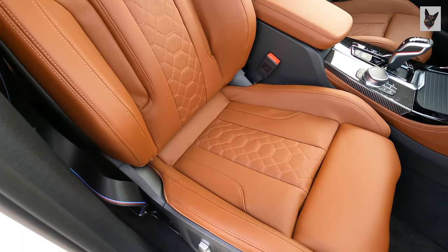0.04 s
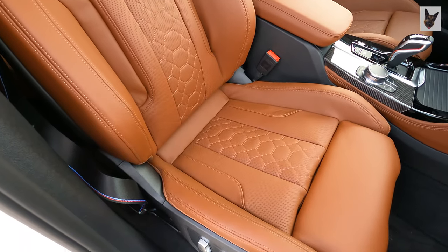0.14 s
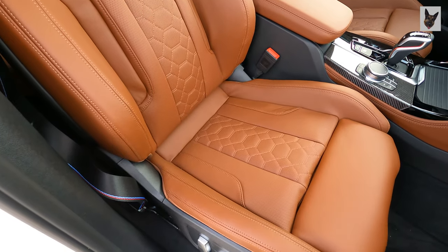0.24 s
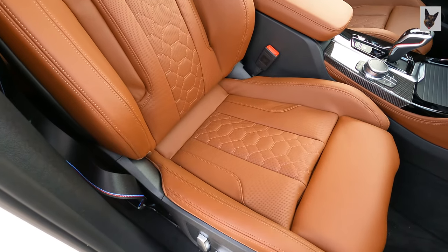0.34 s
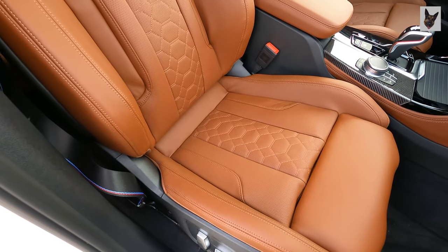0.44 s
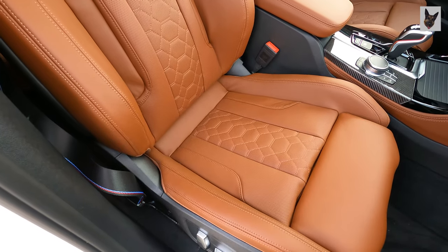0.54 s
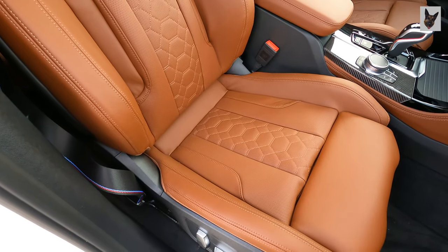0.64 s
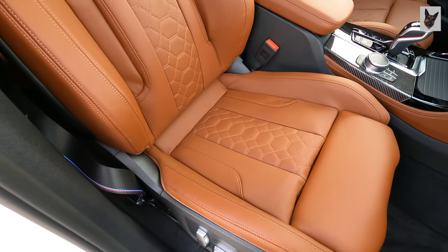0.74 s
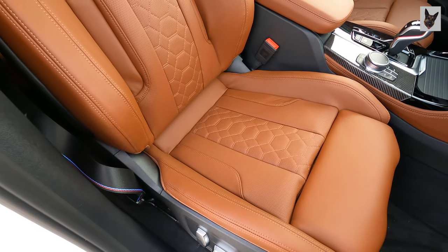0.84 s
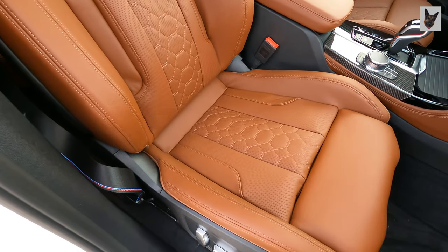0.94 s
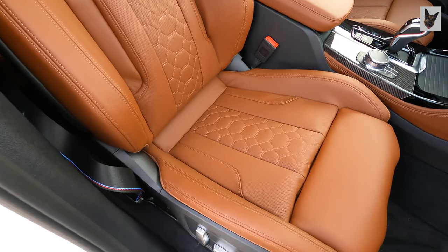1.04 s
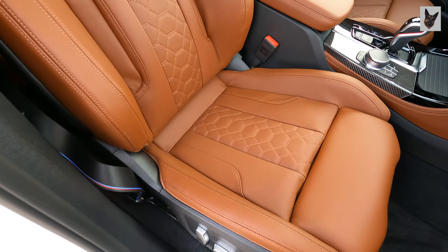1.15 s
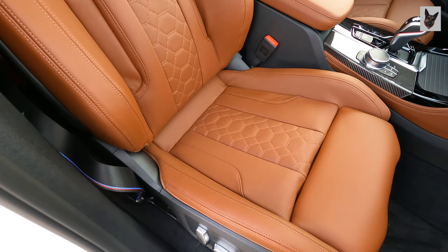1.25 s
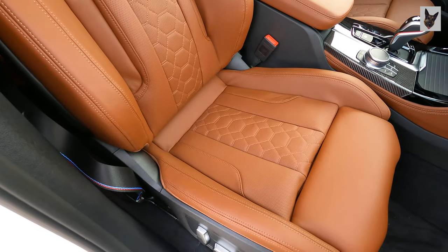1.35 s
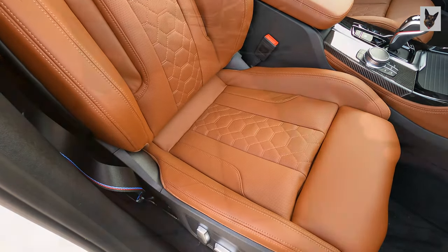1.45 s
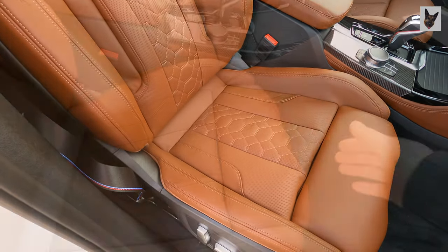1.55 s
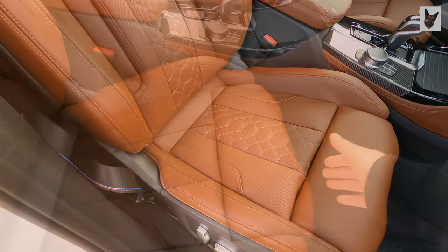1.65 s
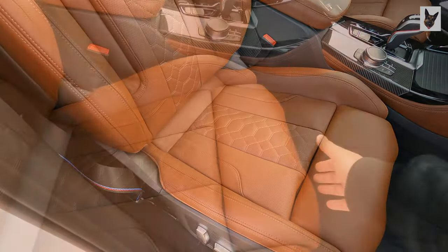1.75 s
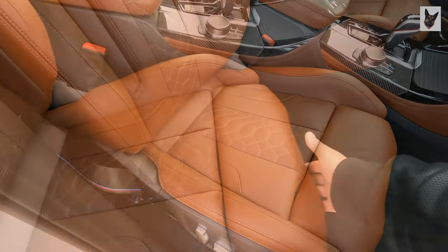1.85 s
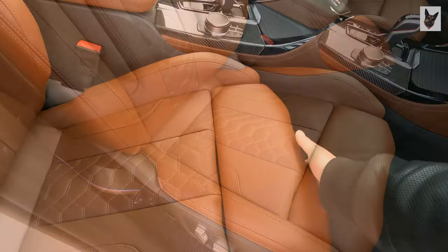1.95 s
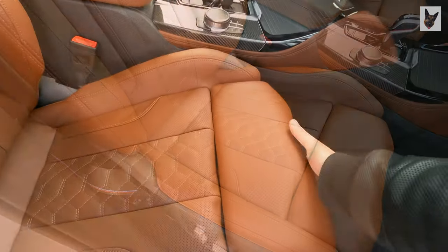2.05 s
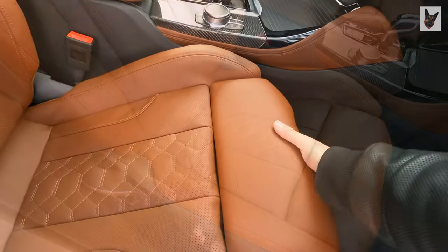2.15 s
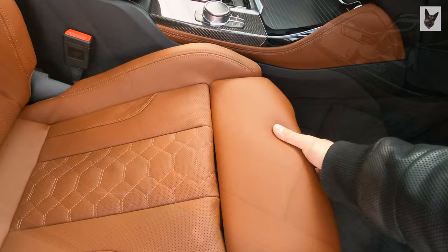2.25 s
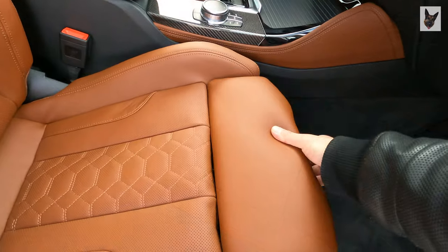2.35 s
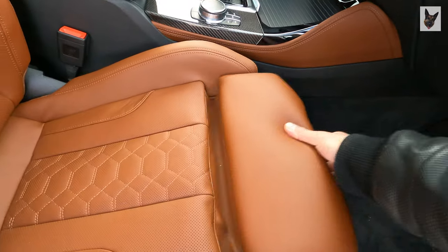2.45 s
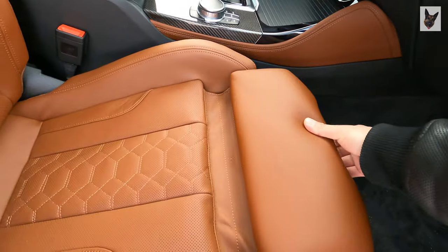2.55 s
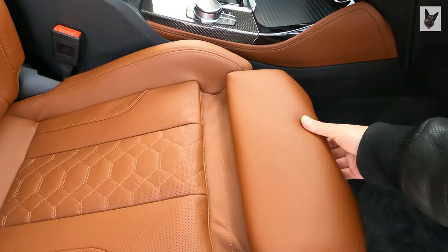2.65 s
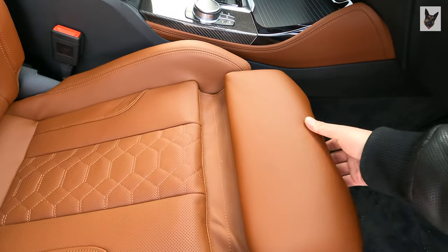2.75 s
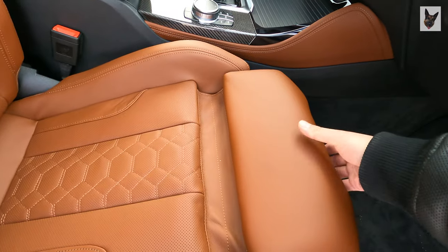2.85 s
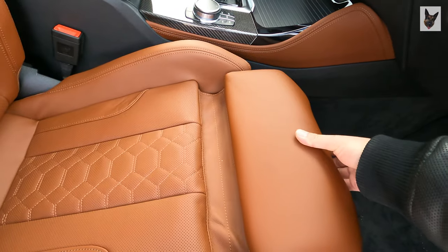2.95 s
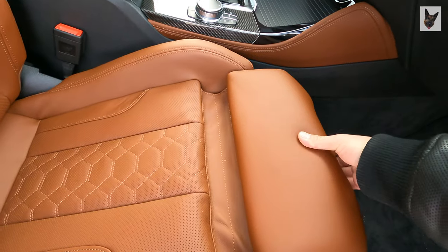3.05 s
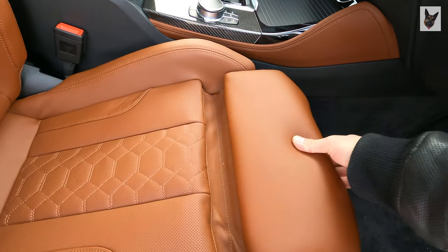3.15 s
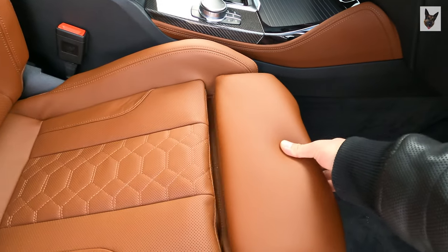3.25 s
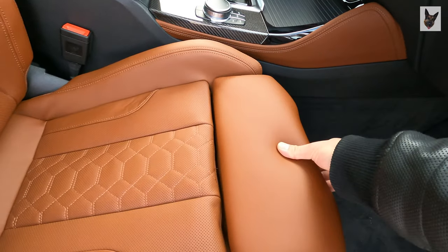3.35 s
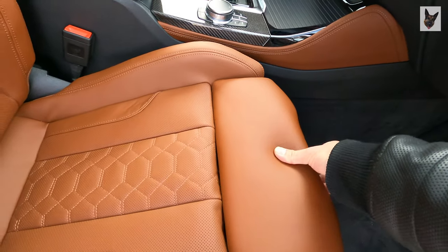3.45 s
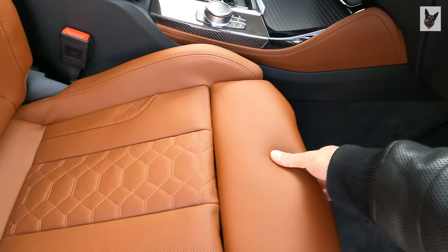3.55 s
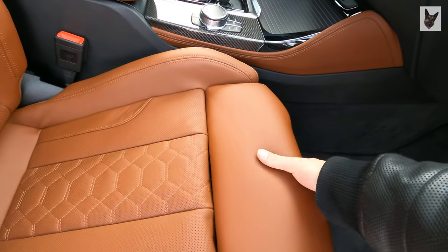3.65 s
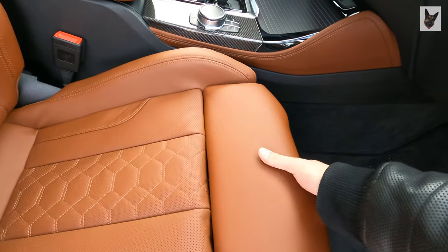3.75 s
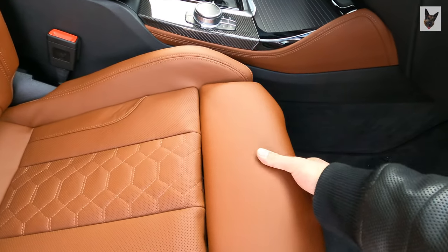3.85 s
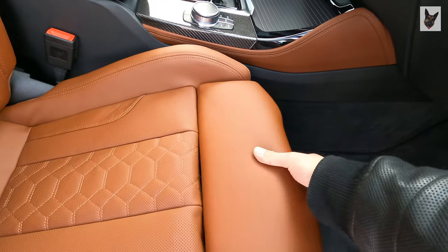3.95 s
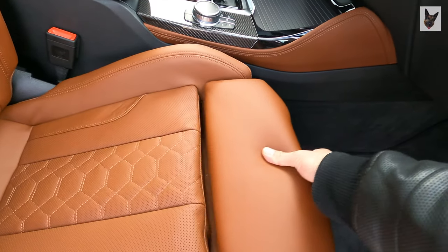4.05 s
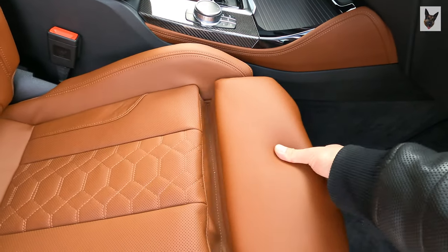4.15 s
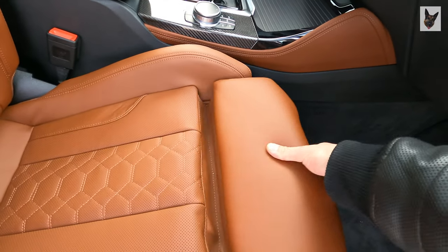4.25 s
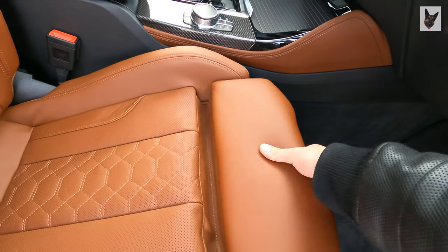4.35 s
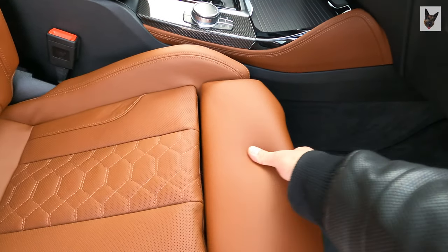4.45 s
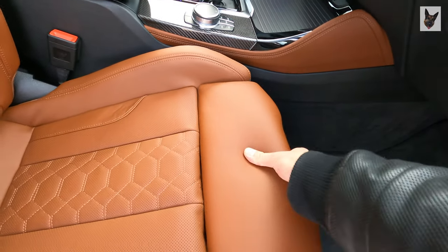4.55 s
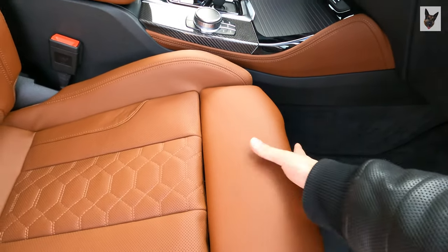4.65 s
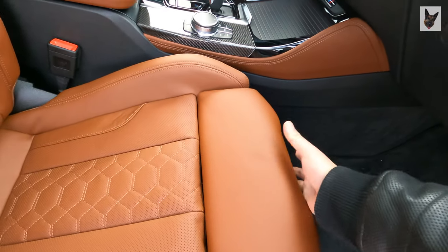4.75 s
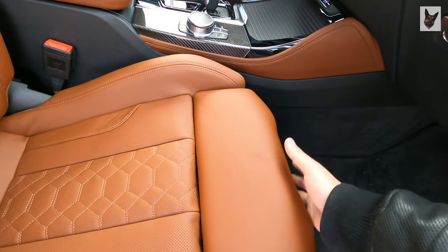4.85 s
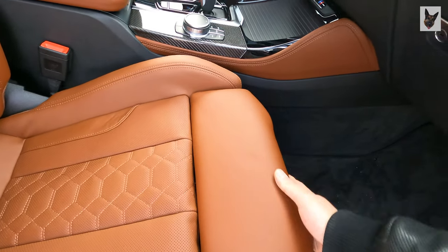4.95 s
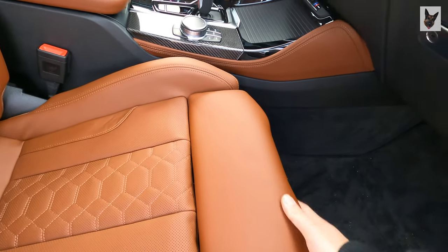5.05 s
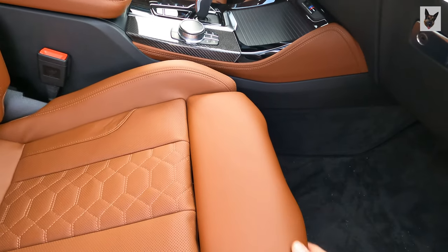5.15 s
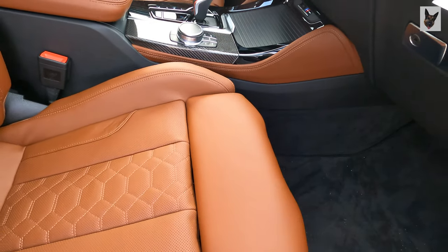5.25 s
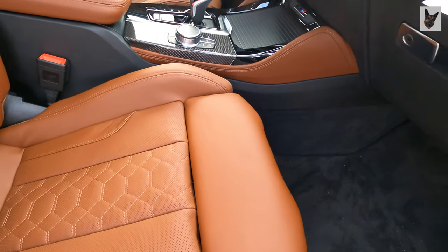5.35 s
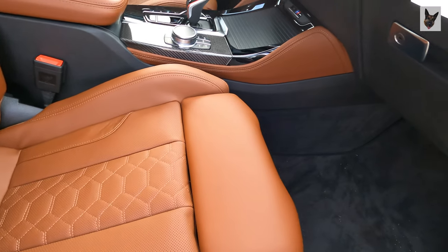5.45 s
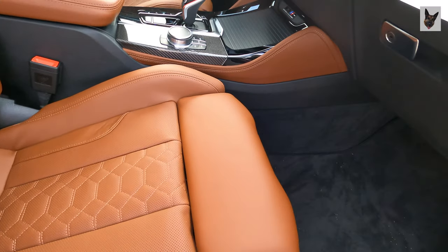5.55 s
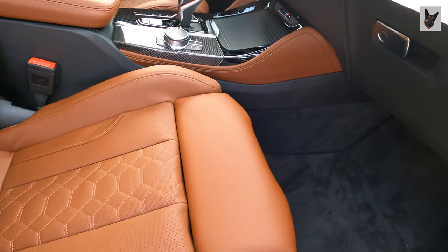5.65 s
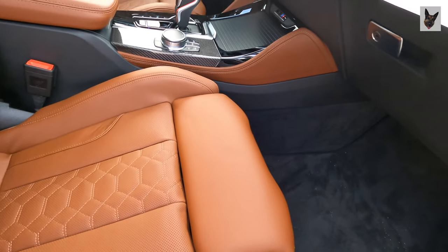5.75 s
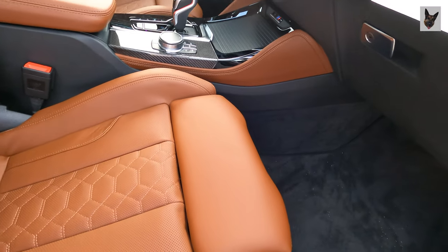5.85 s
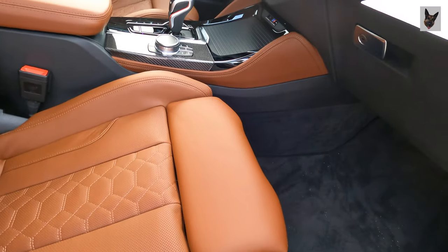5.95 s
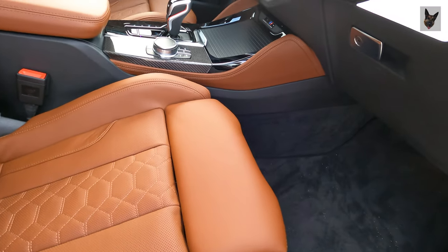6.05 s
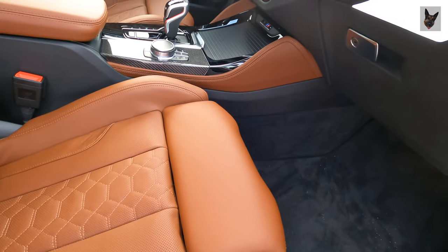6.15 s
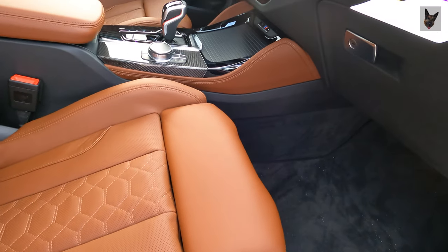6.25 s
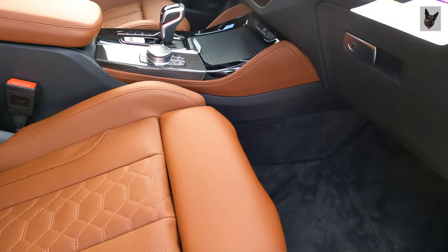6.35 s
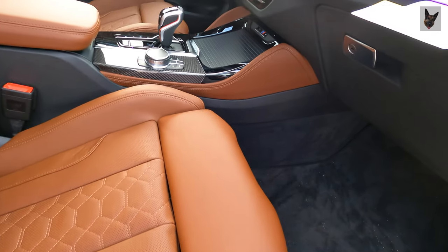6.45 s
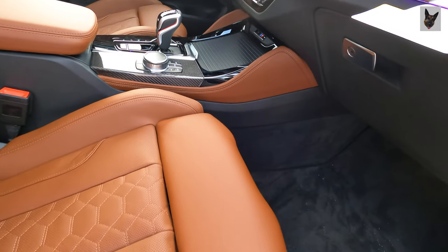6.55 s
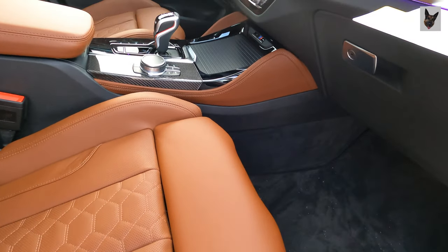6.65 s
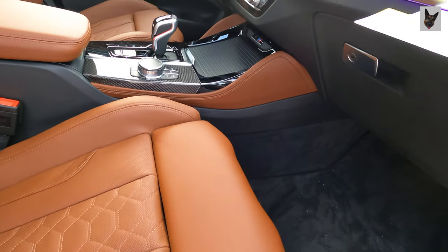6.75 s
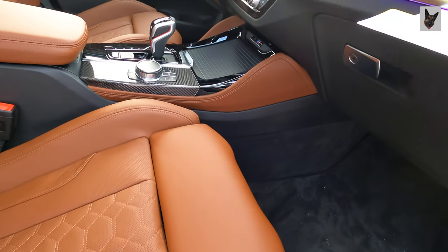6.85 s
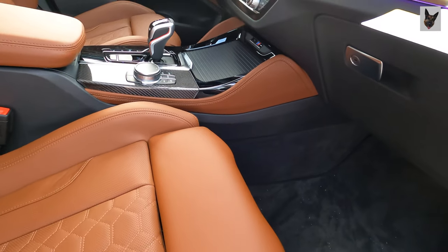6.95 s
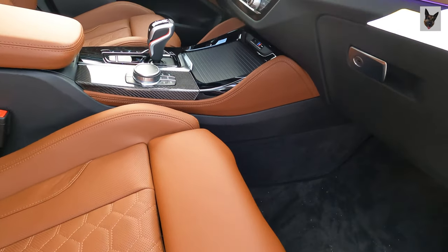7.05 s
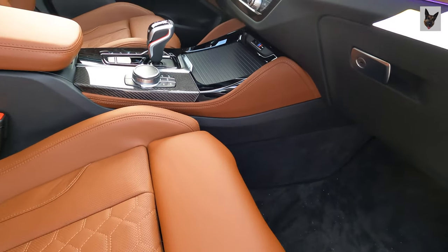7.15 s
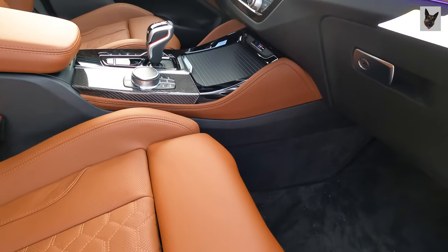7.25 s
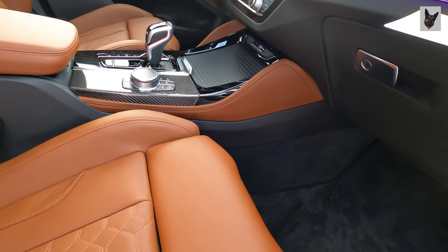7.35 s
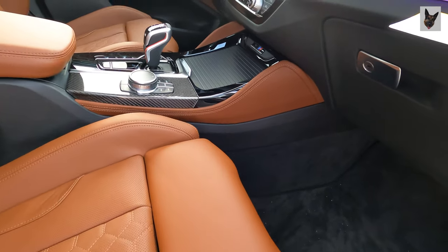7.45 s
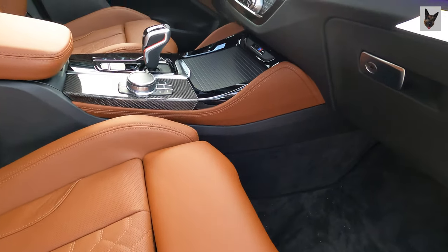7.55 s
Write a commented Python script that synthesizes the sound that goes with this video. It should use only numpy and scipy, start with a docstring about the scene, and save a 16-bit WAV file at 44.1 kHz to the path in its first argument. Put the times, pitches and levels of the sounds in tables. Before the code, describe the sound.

Inside a softly rumbling car, a hand shoves a leather seat cushion back and forth with gritty slides, leathery creaks and padded clunks.

```python
"""The sliding thigh cushion of a leather car seat is worked by hand: padded knocks and gritty slides.
Knocks: noise crack, modal shell, bouncing damped thump; pings: decaying sines; slides: gated noise.
Creaks, ticks and fingertip touches are uneven noise through resonances; the sleeve is grained noise.
A muffled rumble and faint hiss run throughout; small ticks follow as the hand draws away.
The stereo image closes to the centre before the cushion moves, then slowly reopens."""
import sys
import numpy as np
from scipy import signal
from scipy.fft import rfft, irfft, next_fast_len
from scipy.io import wavfile
from scipy.ndimage import uniform_filter1d

SR = 44100
rng = np.random.default_rng(int(sys.argv[2]) if len(sys.argv) > 2 else 0)


def wrap_up_sound(samples):
    """Save the sound to the file named by the first command line argument, as 16-bit audio."""
    columns = np.atleast_2d(samples).T
    # keep every value between -1 and 1, then stretch to whole-number steps
    tamed = np.clip(columns, -1, 1)
    steps = np.round(tamed * 32767).astype(np.int16)
    wavfile.write(sys.argv[1], SR, steps)


N = 335315
TIME = np.arange(N) / SR


def from_db(db):
    """Decibels to gain."""
    return 10 ** (np.asarray(db) / 20)


def rms_one(x):
    """Scale to unit power."""
    return x / np.sqrt(np.mean(x ** 2) + 1e-20)


def peak_one(x):
    """Scale so the loudest 4 ms of the channel mean have unit power."""
    power = uniform_filter1d(np.mean(x, axis=0) ** 2, size=176)
    return x / np.sqrt(power.max())


def add(out, s, sound):
    """Mix a sound in at time s."""
    start = int(s * SR)
    out[:, start:start + sound.shape[-1]] += sound[..., :N - start]


def ramp(s, length_s):
    """Rise evenly from 0 at time s to 1."""
    return np.clip((TIME - s) / length_s, 0, 1)


def bell(middle_s, spread_s):
    """Gaussian swell of height 1."""
    return np.exp(-np.minimum(((TIME - middle_s) / spread_s) ** 2, 100) / 2)


def arch(s, length_s, roundness=0.7):
    """A stroke that starts and ends at rest."""
    return np.abs(np.sin(np.pi * ramp(s, length_s))) ** roundness


def swell_and_die(t, peak_s, sharpness):
    """A contact that builds to height 1 at peak_s and dies away."""
    return (t / peak_s * np.exp(1 - t / peak_s)) ** sharpness


def shove(s, run_up_s, glide_s, slowing_db_per_s, stop_db_per_s):
    """A push gathers speed, glides with a gradual level change, then stops at a steeper rate."""
    t = np.maximum(TIME - s - run_up_s, 0)
    glide_loss_db = slowing_db_per_s * np.minimum(t, glide_s)
    stop_loss_db = stop_db_per_s * np.maximum(t - glide_s, 0)
    run_up = np.sin(ramp(s, run_up_s) * np.pi / 2) ** 2
    return run_up * from_db(-glide_loss_db - stop_loss_db)


def gain_at(points, hz):
    """Read a spectrum on a log-frequency axis."""
    knots_hz, db = np.transpose(points)
    return from_db(np.interp(np.log(hz + 1), np.log(knots_hz), db))


# stereo width: f/Hz, side re mid level/dB
STEREO_WIDTH = [(60, -27.5), (130, -32.5), (220, -20.5), (380, -18), (700, -8.5), (1290, -6), (2400, -4),
                (4400, -4.5), (8000, -4), (14000, 9)]


def noise(spectrum, size=N):
    """Coloured noise on two close microphones: alike in the bass, wider in the treble."""
    padded = next_fast_len(size)
    hz = np.arange(padded // 2 + 1) * SR / padded
    mid, side = rfft(rng.standard_normal((2, padded))) * gain_at(spectrum, hz)
    side = side * gain_at(STEREO_WIDTH, hz)
    mid, side = irfft([mid, side], padded)[:, :size]
    return np.array([mid + side, mid - side]) / mid.std()


def grain(rate_hz, depth_db, size=N):
    """Uneven grip: a random gain, interpolated between draws at rate_hz."""
    knots = np.arange(size) * rate_hz / SR
    steps = rng.standard_normal(int(knots[-1]) + 2)
    return rms_one(from_db(depth_db * np.interp(knots, np.arange(len(steps)), steps)))


def low_pass(x, hz, order=2):
    """Butterworth low-pass."""
    return signal.sosfilt(signal.butter(order, hz, fs=SR, output="sos"), x)


def resonate(x, hz, width_hz):
    """Two-pole resonance, gain about 1 at its peak."""
    r = np.exp(-np.pi * width_hz / SR)
    zeros = np.array([1, 0, -1]) * (1 - r * r) / 2
    poles = [1, -2 * r * np.cos(2 * np.pi * hz / SR), r * r]
    return signal.lfilter(zeros, poles, x)


# plastic shell modes under the cushion: f/Hz, width/Hz, level/dB
SHELL_MODES = [(415, 105, 2.5), (560, 114, 6.5), (653, 164, 8), (780, 270, -2), (1070, 250, -8.5),
               (1250, 200, -10), (1580, 36, -4.5), (2320, 50, -5), (2800, 70, -20), (3100, 70, -20),
               (3590, 51, -27.5), (4270, 30, -21.5)]


def shell(x):
    """The shell's modes in parallel, signs alternating."""
    return sum((-1) ** k * from_db(db) * resonate(x, hz, width_hz)
               for k, (hz, width_hz, db) in enumerate(SHELL_MODES))


# rumble and hiss spectra: f/Hz, relative level/dB per Hz
RUMBLE_SPECTRUM = [(12, -30), (20, -2), (33, 3), (54, -1), (103, 0.5), (140, -5.5), (163, -8), (206, -12.5),
                   (354, -14.5), (490, -24.5), (595, -22.5), (1040, -23), (1870, -36.5), (2590, -51.5),
                   (3500, -61), (4550, -95.5), (7700, -120)]
HISS_SPECTRUM = [(2500, -9), (4000, -1), (6000, 0.5), (7600, -4), (8600, -16), (15000, -36.5)]
# slow rumble swell: t/s, level/dB
RUMBLE_SWELL = [(0, 1.5), (1.2, 1.7), (2.2, 1.3), (5.2, -1.5), (6.2, 0.6), (7.6, -.5)]
RUMBLE_DB, HISS_DB = -37.5, -84.5


def cabin():
    """Steady muffled rumble, slightly swelling, over a faint hiss."""
    rumble_db = RUMBLE_DB + np.interp(TIME, *np.transpose(RUMBLE_SWELL))
    rumble = from_db(rumble_db) * low_pass(noise(RUMBLE_SPECTRUM), 4200)
    return rumble + from_db(HISS_DB) * noise(HISS_SPECTRUM)


# arm moves in the sleeve: t/s, length/s, level/dB
ARM_MOVES = [(1.667, 0.32, -67), (1.92, 0.35, -59), (2.157, 0.3, -64.5), (2.614, 0.46, -69),
             (3.45, 0.41, -65.5), (3.804, 0.18, -70), (4.308, 0.095, -61.5), (4.62, 0.45, -71.5),
             (5.054, 0.25, -60), (5.22, 0.67, -66.5), (5.838, 0.5, -68)]
# cloth and palm spectra: f/Hz, relative level/dB per Hz
CLOTH_SPECTRUM = [(800, 1.5), (1800, 1.5), (3500, -1.5), (5500, -7), (8000, -12.5), (10500, -23.5),
                  (15000, -36.5)]
PALM_SPECTRUM = [(1000, 0), (4000, 0), (8000, -19), (10000, -8), (15500, -14)]
ARM_SPREAD = 0.37   # bell spread / move length
SHOVE_RUSTLE_DB, SHOVE_RUSTLE_SPREAD_S = -60, 0.03
PALM_START_S, PALM_LENGTH_S, PALM_DB = 5.02, 0.29, -67


def sleeve():
    """Finely grained rustle of arm moves and rail shoves; one brighter stroke as the palm leaves."""
    moves = [from_db(db) * bell(s + length_s / 2, ARM_SPREAD * length_s)
             for s, length_s, db in ARM_MOVES]
    moves += [from_db(SHOVE_RUSTLE_DB) * bell(s + run_up_s, SHOVE_RUSTLE_SPREAD_S)
              for s, run_up_s, *_ in SLIDES]
    motion = np.linalg.norm(moves, axis=0)   # power sum
    cloth = motion * noise(CLOTH_SPECTRUM) * grain(rate_hz=79, depth_db=0.8)
    palm = arch(PALM_START_S, PALM_LENGTH_S) * noise(PALM_SPECTRUM)
    return cloth + from_db(PALM_DB) * palm


# fingertips on a housing: t/s, length/s, level/dB, upper mode level/dB
TOUCHES = [(1.899, 0.0074, -68.5, 5), (5.659, .01, -71, -7), (6.016, .065, -70, -9),
           (6.494, 0.071, -64.5, -17), (6.589, 0.0085, -66, 6)]
# fingertip spectrum: f/Hz, relative level/dB per Hz
FINGERTIP_SPECTRUM = [(3000, 2), (6000, 3), (8300, 1), (10500, -10), (15000, -7)]
HOUSING_HZ, HOUSING_WIDTH_HZ = 7700, 750
HOUSING_TOP_HZ, HOUSING_TOP_WIDTH_HZ = 12000, 800
LEFT_OVER_RIGHT_DB = 11


def touches(grip=0.7):
    """Fingertips shift on a hard housing near the left microphone: two high modes, ticks and scuffs."""
    out, t = np.zeros((2, N)), TIME[:SR // 8]
    pan_db = LEFT_OVER_RIGHT_DB * np.array([[.5], [-.5]])
    for s, length_s, db, top_db in TOUCHES:
        slips = noise(FINGERTIP_SPECTRUM, size=len(t)).mean(axis=0)
        slips = slips * grain(rate_hz=500, depth_db=3.0, size=len(t))
        slips = slips * np.sin(np.pi * np.minimum(t / length_s, 1) ** grip) ** 2
        main_mode = resonate(slips, HOUSING_HZ, HOUSING_WIDTH_HZ)
        top_mode = resonate(slips, HOUSING_TOP_HZ, HOUSING_TOP_WIDTH_HZ)
        ring = main_mode - from_db(top_db) * top_mode
        add(out, s, from_db(db + pan_db) * peak_one(ring[None]))
    return out


# leather creaks and finger scuffs: t/s, length/s, level/dB (before the swell), f/Hz, width/Hz
CREAKS = [(2.173, 0.036, -52, 2500, 2500), (2.257, .049, -45, 2240, 1380), (2.335, 0.05, -51.5, 2500, 2000),
          (2.633, 0.03, -51, 5470, 2000), (2.733, 0.023, -49, 3020, 2500), (2.919, 0.24, -66, 2920, 1000),
          (3.16, 0.066, -50, 2880, 2200), (3.192, 0.051, -46, 2800, 600), (3.502, 0.083, -49.5, 3480, 9000),
          (3.498, 0.091, -47, 449, 250), (3.65, 0.025, -39, 700, 600), (3.651, 0.068, -37, 2500, 2400),
          (4.086, 0.055, -46.5, 1500, 3000), (4.19, .06, -53, 2400, 2000), (4.288, 0.035, -41, 1700, 3000),
          (4.363, .03, -59, 3000, 2000), (4.549, 0.043, -44, 1700, 3000), (4.625, 0.1, -60.5, 4000, 5000),
          (4.677, 0.051, -45, 600, 300), (4.671, 0.11, -41, 2660, 4000), (5.198, 0.1, -55.5, 3140, 3000),
          (6.014, 0.087, -64, 4500, 4000), (6.183, 0.091, -53.5, 2600, 3000),
          (6.492, 0.086, -63.5, 4020, 5000)]
# leather spectrum: f/Hz, relative level/dB per Hz
LEATHER_SPECTRUM = [(200, -22.5), (700, 22), (2500, 4), (5000, -4.5), (8000, -9.5), (10500, -20),
                    (15000, -21)]


def creaks(grip=0.67):
    """Skin sticks and slips on leather: dense, uneven slips that swell and ease off."""
    out = np.zeros((2, N))
    for s, length_s, db, hz, width_hz in CREAKS:
        size = int(length_s * SR)
        slips = noise(LEATHER_SPECTRUM, size=SR // 4) * grain(rate_hz=500, depth_db=3.0, size=SR // 4)
        creak = rms_one(resonate(slips, hz, width_hz)[:, :size])
        pressure = np.sin(np.pi * np.linspace(0, 1, size) ** grip) ** 2
        add(out, s, from_db(db) * pressure * creak)
    return out


# seam and trim ticks: t/s, level/dB, f/Hz
TICKS = [(2.267, -37.5, 620), (2.178, -58, 3640), (2.804, -60, 3300), (3.772, -59, 3400),
         (3.176, -41, 1200), (3.177, -46, 2880), (3.177, -55, 6300), (3.372, -39.5, 556),
         (3.655, -36.5, 980), (3.657, -42, 2400), (3.670, -37, 2300), (4.093, -47, 880), (4.310, -37, 1100),
         (4.679, -39.5, 580), (4.680, -48, 4500), (5.662, -58, 3400), (5.761, -69, 5500),
         (5.858, -47, 1880), (5.858, -60.5, 4000), (6.107, -53, 2320), (6.108, -67, 5200),
         (6.216, -58, 4500), (6.220, -49, 950), (6.223, -45.5, 2350), (6.224, -60, 5200),
         (6.591, -64, 4700), (7.557, -64, 6250)]


def ticks(decay_s=0.004, damping=0.28, ref_hz=2000, shortening=0.47, rise_s=0.00035):
    """Tiny snaps, each through one broad resonance; the higher, the shorter (decay_s at ref_hz)."""
    out, t = np.zeros((2, N)), TIME[:SR // 12]
    spectrum = [(500, 20), (2000, 7.0), (7000, -10.5), (15000, -26.5)]
    for s, db, hz in TICKS:
        decay = np.exp(-t / decay_s * (hz / ref_hz) ** shortening)
        snap = noise(spectrum, size=len(t)) * decay * (1 - np.exp(-t / rise_s))
        add(out, s, from_db(db) * peak_one(resonate(snap, hz, damping * hz)))
    return out


# latch and rail pings: t/s, level/dB, f/Hz
PINGS = [(2.268, -41, 2300), (2.499, -40.5, 6520), (2.499, -38, 4340), (2.5995, -40, 2130),
         (2.5995, -34, 880), (3.231, -35, 3545), (3.231, -32, 2810), (3.231, -31.5, 1596),
         (3.69, -27.5, 1640), (3.69, -33, 1990), (3.69, -35, 2890), (3.69, -37, 4220), (4.521, -30.5, 1500),
         (4.521, -40, 3380), (4.718, -34, 3070), (4.717, -37, 3310), (5.858, -48, 1860)]


def pings(decay_s=0.0095, rise_s=0.00043):
    """Short metal modes of the latch and rails: decaying sines."""
    out, t = np.zeros((2, N)), TIME[:SR // 5]
    envelope = np.exp(-t / decay_s) * (1 - np.exp(-t / rise_s))
    for s, db, hz in PINGS:
        add(out, s, from_db(db) * np.sin(2 * np.pi * hz * t) * envelope)
    return out


# cushion shoves: t/s, run-up/s, glide/s, friction level/dB, judder level/dB, slowing/(dB/s)
SLIDES = [(2.49, 0.012, 0.099, -38.5, -30, -1), (3.150, 0.2, 0.07, -44.5, -31.5, 74.5),
          (4.107, 0.024, 0.11, -40, -24, 115), (4.478, 0.031, 0.063, -42.5, -34, -1)]
# runner and cushion spectra: f/Hz, relative level/dB per Hz
FRICTION_SPECTRUM = [(180, -52), (300, -6), (509, -7), (581, -4.5), (769, -14.5), (1120, -10), (1260, -12),
                     (1560, -8), (2170, -8), (2440, -10.5), (2880, -12.5), (6900, -23.5), (9500, -33),
                     (11000, -40.5), (15500, -46)]
JUDDER_SPECTRUM = [(20, 5), (40, -6), (80, 9), (125, 4.5), (165, -0.5), (230, -10), (400, -12.5),
                   (800, -65)]
FRICTION_STOP_DB_PER_S, JUDDER_STOP_DB_PER_S = 372, 162   # the cushion outlasts the runners


def rails():
    """Gritty runner friction, partly through the shell, while the cushion judders above."""
    friction = judder = 0
    for s, run_up_s, glide_s, friction_db, judder_db, slowing in SLIDES:
        runner = shove(s, run_up_s, glide_s, slowing, FRICTION_STOP_DB_PER_S)
        cushion = shove(s, run_up_s, glide_s, slowing, JUDDER_STOP_DB_PER_S)
        friction = friction + from_db(friction_db) * runner
        judder = judder + from_db(judder_db) * cushion
    grit = noise(FRICTION_SPECTRUM)
    grit = grit * grain(rate_hz=600, depth_db=2.3) * grain(rate_hz=90, depth_db=0.7)
    scrape = rms_one(grit + from_db(1.5) * shell(grit))
    return friction * scrape + judder * low_pass(noise(JUDDER_SPECTRUM), 760)


def favoured(hz, favoured_hz, emphasis_db=6.0, spread_octaves=0.29):
    """The place of a blow brings out the modes near one pitch."""
    octaves = np.log2(hz / favoured_hz)
    return from_db(emphasis_db * np.exp(-(octaves / spread_octaves) ** 2))


def struck_shell(t, favoured_hz, uneven_db=2.0, tap_hz=2600):
    """One padded tap rings all shell modes, each at a slightly random strength."""
    tap = low_pass(1.0 * (t == 0), tap_hz) + 1e-18
    strengths = from_db(uneven_db * rng.standard_normal(len(SHELL_MODES)))
    return sum((-1) ** k * strengths[k] * favoured(hz, favoured_hz) * from_db(db) * resonate(tap, hz, width_hz)
               for k, (hz, width_hz, db) in enumerate(SHELL_MODES))


REBOUND_S, REBOUND_DB, REBOUND_PITCH = 0.0172, -10.5, 0.92   # delay, level, pitch ratio
BOOM_HZ, BOOM_WIDTH_HZ, BOOM_DB = 101.6, 15, -7   # cabin's low resonance


def thump(t, hz, peak_s=0.00747):
    """Foam-damped swings with one softer, lower bounce; the cabin air booms on a little longer."""
    def swing(t, hz):
        """One damped swing burst, peaking at peak_s."""
        envelope = swell_and_die(np.maximum(t, 0), peak_s, sharpness=9.2)
        return np.cos(2 * np.pi * hz * (t - peak_s)) * envelope
    swings = swing(t, hz) + from_db(REBOUND_DB) * swing(t - REBOUND_S, REBOUND_PITCH * hz)
    return swings + from_db(BOOM_DB) * resonate(swings, BOOM_HZ, BOOM_WIDTH_HZ)


# latch and end-stop knocks: t/s, crack level/dB, contact top f/Hz, shell level/dB, favoured shell f/Hz,
# thump level/dB, thump f/Hz, ring f/Hz, ring level/dB, ring swell/s
KNOCKS = [(2.4998, -31, 11000, -26, 480, -31, 260, 2280, -29.5, 0.0047),
          (2.515, -46, 7000, -42, 420, -29, 120, 2290, -44, .004),
          (2.533, -51, 3500, -43, 550, -23.5, 185, 2300, -51, .004),
          (2.572, -39, 5500, -37, 800, -12.5, 145, 1480, -44, .003),
          (2.5993, -36.5, 4000, -25.5, 610, -25.5, 230, 2670, -31, 0.0014),
          (2.6406, -55, 7500, -39.5, 680, -25, 160, 670, -37, 0.0027),
          (2.740, -40.5, 4500, -35.5, 650, -16.5, 134, 1040, -34.5, 0.0022),
          (3.2308, -29.5, 6500, -22.5, 540, -21.5, 151, 1065, -16, 0.0024),
          (3.6903, -24, 6500, -25.5, 570, -9.5, 186, 1850, -22.5, 0.0012),
          (4.1194, -33.5, 10000, -31.5, 900, -26.5, 125, 1470, -42, .0011),
          (4.126, -48, 6500, -45, 450, -23.5, 221, 1890, -51, .002),
          (4.139, -48, 6500, -33, 550, -22.5, 125, 1170, -44, 0.0036),
          (4.3056, -35.5, 7900, -34, 627, -17, 154, 2460, -34.5, 0.0019),
          (4.5209, -32, 4300, -24.5, 560, -28, 160, 1070, -25, 0.0025),
          (4.5720, -38, 7000, -29, 480, -17, 150, 1490, -41, .0015),
          (4.7167, -24, 5460, -22, 560, -9, 203, 1620, -32, .0022)]
# crack spectrum: f/Hz, relative level/dB per Hz
CRACK_SPECTRUM = [(500, 13.5), (1200, 3), (1900, 5), (2900, 1.5), (4200, -2), (6300, -9), (8500, -11.5),
                  (11000, -21), (15000, -22)]


def knocks(chatter_s=0.0092, tail_s=0.02, tail_db=-15.0, rise_s=0.0014, rattle_db=-12, rattle_peak_s=0.005):
    """Contact cracks and chatters, the shell rings and rattles, the padded cushion thumps just after."""
    out, t = np.zeros((2, N)), TIME[:SR // 5]
    rattle_spectrum = [(200, -2.0), (4000, -16), (12000, -34.0)]
    cabin_tail = from_db(tail_db) * np.exp(-t / tail_s)
    for (s, crack_db, top_hz, shell_db, favoured_hz,
         thump_db, thump_hz, ring_hz, ring_db, ring_swell_s) in KNOCKS:
        chatter = np.exp(-t / chatter_s) * grain(rate_hz=1200, depth_db=3.0, size=len(t))
        contact = noise(CRACK_SPECTRUM, size=len(t)) * (chatter + cabin_tail) * (1 - np.exp(-t / rise_s))
        crack = peak_one(low_pass(contact, top_hz))   # softer contacts are duller
        buzz = noise(rattle_spectrum, size=len(t)) * swell_and_die(t, rattle_peak_s, sharpness=1)
        rattle = peak_one(shell(buzz))
        body = peak_one(struck_shell(t, favoured_hz)[None]) + from_db(rattle_db) * rattle
        # the part hit directly rings at its own pitch
        ring = np.sin(2 * np.pi * ring_hz * t) * swell_and_die(t, ring_swell_s, sharpness=1.9)
        knock = from_db(crack_db) * crack + from_db(shell_db) * body
        knock = knock + from_db(thump_db) * thump(t, thump_hz) + from_db(ring_db) * ring
        add(out, s, knock)
    return out


# seat sways under the last shove: t/s, run-up/s, hold/s, sway level/dB, judder level/dB
SWAYS = [(4.553, 0.015, 0.13, -27.5, -33.5)]
# sway spectrum: f/Hz, relative level/dB per Hz
SWAY_SPECTRUM = [(20, -4), (45, 0.5), (70, -4.5), (120, -22.5), (300, -58), (1000, -100)]
SWAY_STOP_DB_PER_S = 52


def sway():
    """Leaned on, the seat rocks deeply and the cushion judders; the rocking outlasts the push."""
    out = 0
    for s, run_up_s, hold_s, sway_db, judder_db in SWAYS:
        rocking = shove(s, run_up_s, hold_s, 0, SWAY_STOP_DB_PER_S) * noise(SWAY_SPECTRUM)
        judder = shove(s, run_up_s, hold_s, 0, JUDDER_STOP_DB_PER_S) * noise(JUDDER_SPECTRUM)
        out = out + from_db(sway_db) * rocking + from_db(judder_db) * judder
    return out


def scene():
    """Seat and hand close by, inside the rumbling cabin."""
    background = cabin()
    hand = sleeve() + touches() + creaks() + ticks()
    seat = pings() + rails() + knocks() + sway()
    return background + hand + seat


CLOSED_AT_S, CLOSING_S, OPENS_AT_S, OPENING_S = 2.18, 0.68, 4.05, 2.4
SIDE_BEFORE_DB, SIDE_CLOSED_DB, SIDE_AFTER_DB = 0.5, -49, -1.5
CUTOFF_HZ = 15700


def record(dry):
    """The stereo image narrows almost to mono, then widens; the top is cut steeply."""
    mid = dry.mean(axis=0)
    closing = 1 - ramp(CLOSED_AT_S - CLOSING_S, CLOSING_S)
    opening = ramp(OPENS_AT_S, OPENING_S)
    width = from_db(SIDE_BEFORE_DB) * closing + from_db(SIDE_CLOSED_DB) + from_db(SIDE_AFTER_DB) * opening
    image = mid + (dry - mid) * width
    steep_cut = signal.ellip(10, .1, 80, CUTOFF_HZ, fs=SR, output="sos")   # ripple, stop-band in dB
    return signal.sosfilt(steep_cut, image)


dry = scene()
out = record(dry)
wrap_up_sound(out)
```